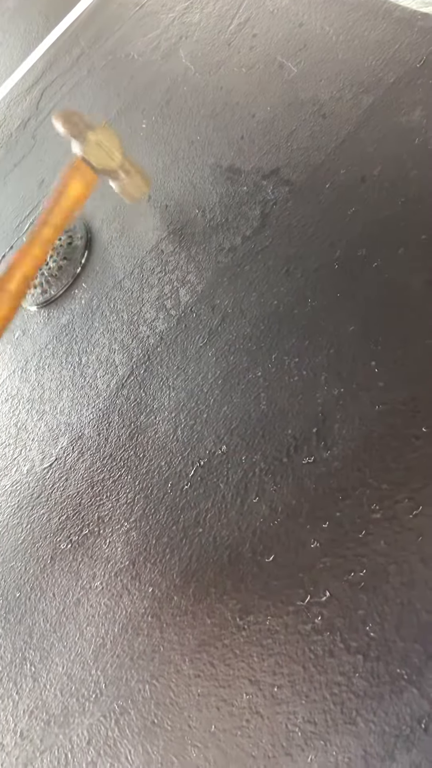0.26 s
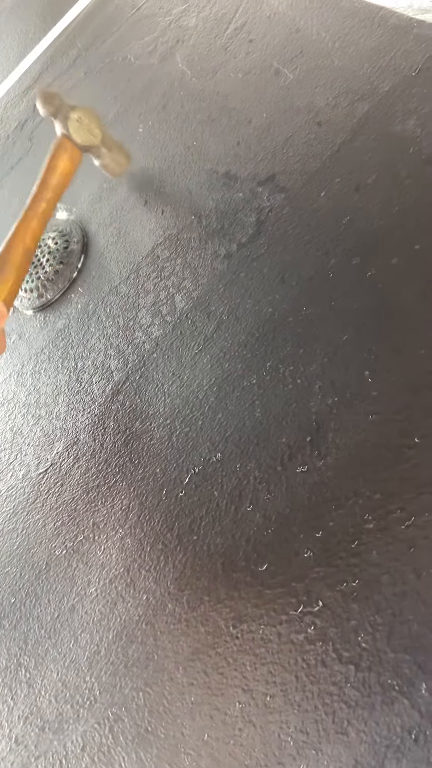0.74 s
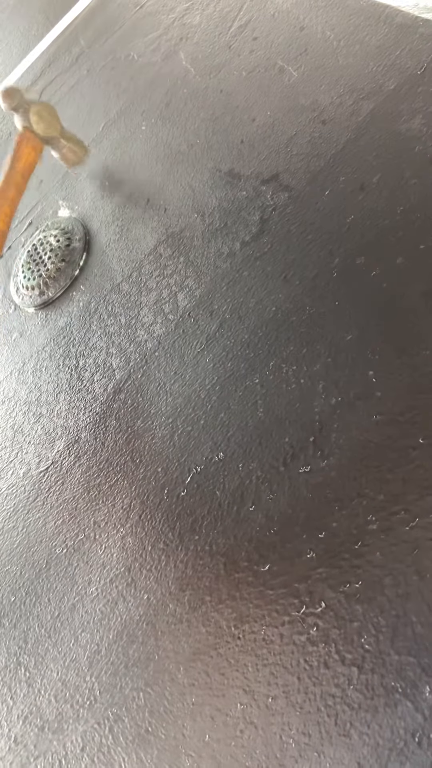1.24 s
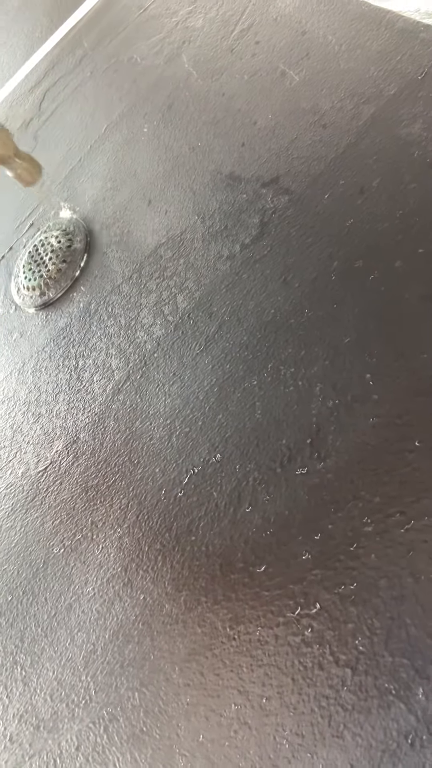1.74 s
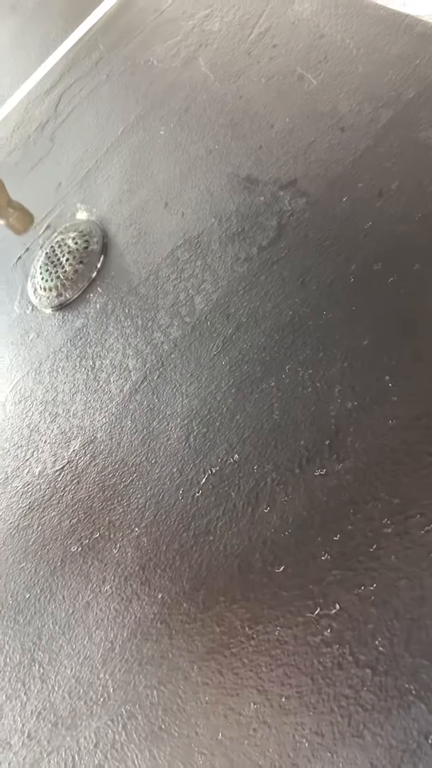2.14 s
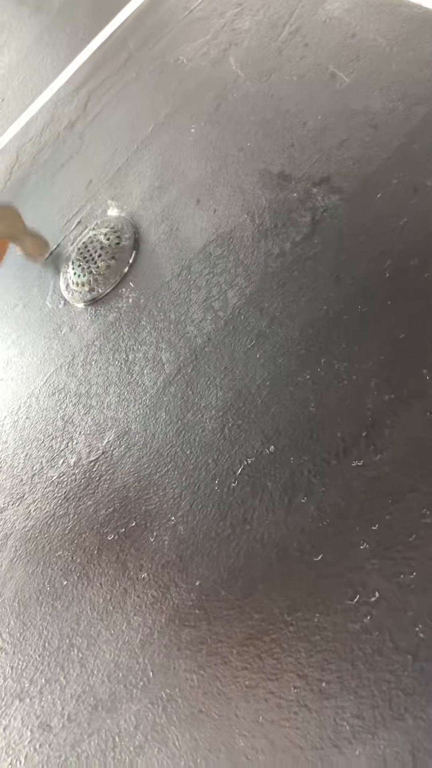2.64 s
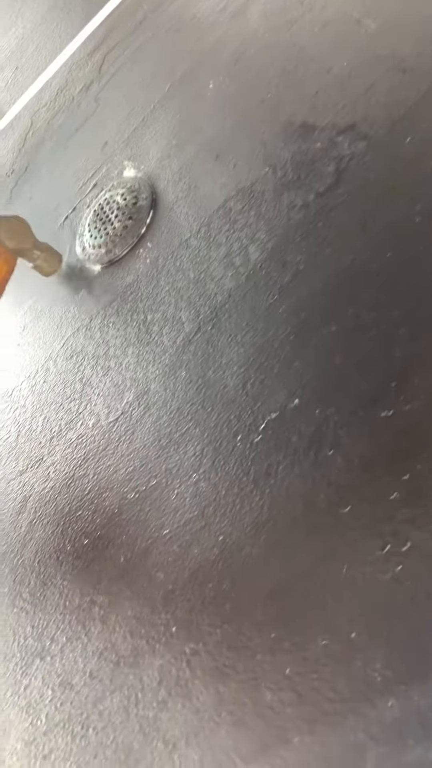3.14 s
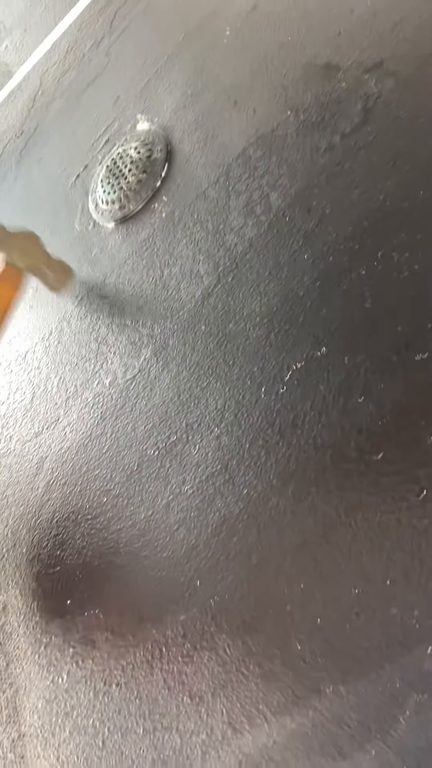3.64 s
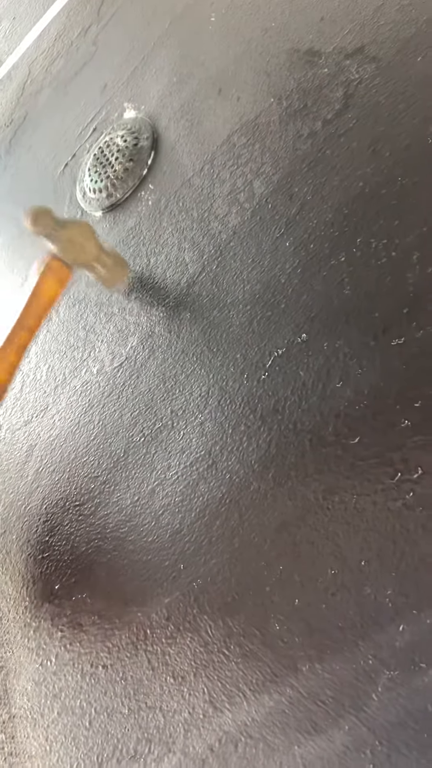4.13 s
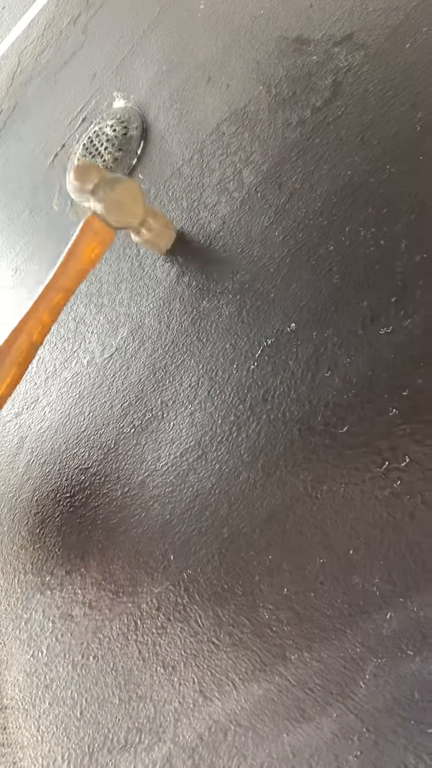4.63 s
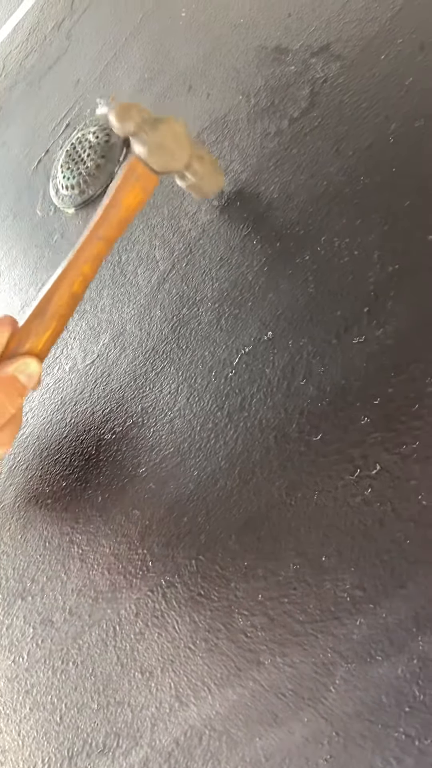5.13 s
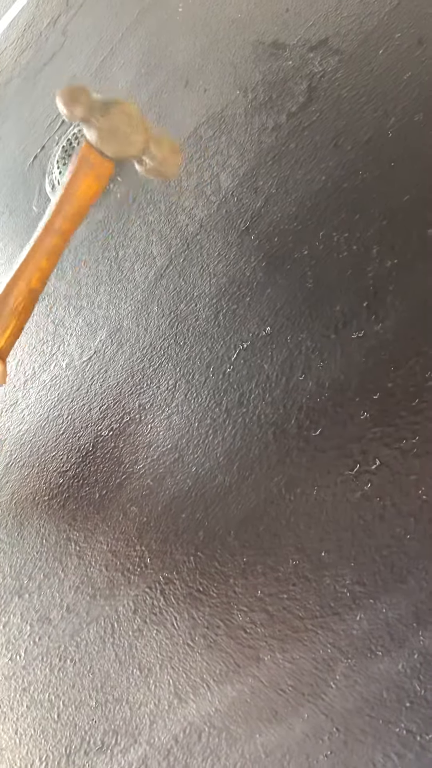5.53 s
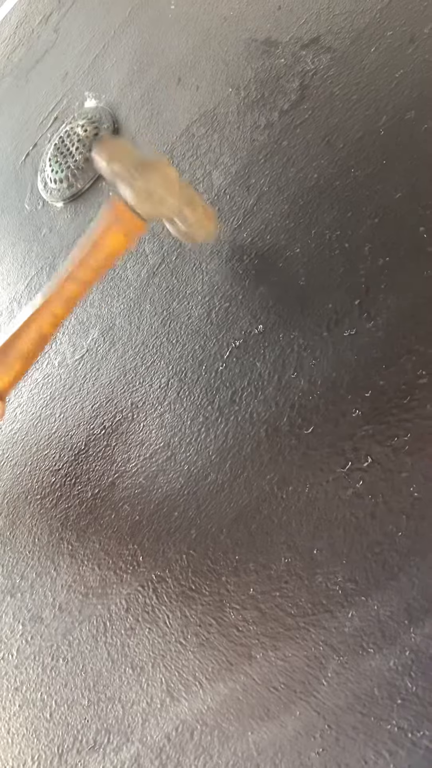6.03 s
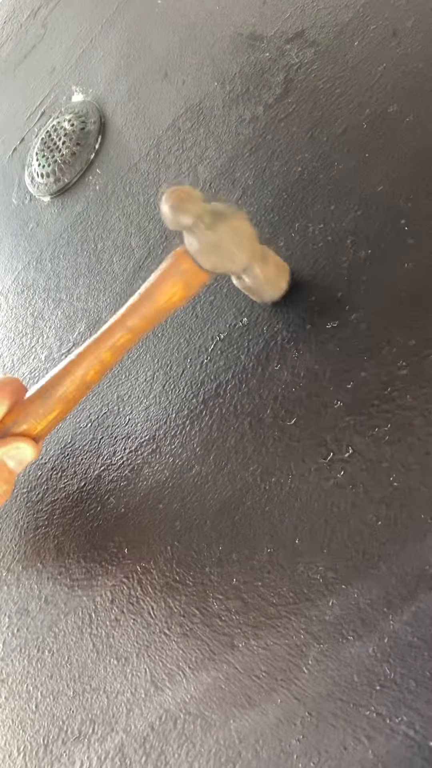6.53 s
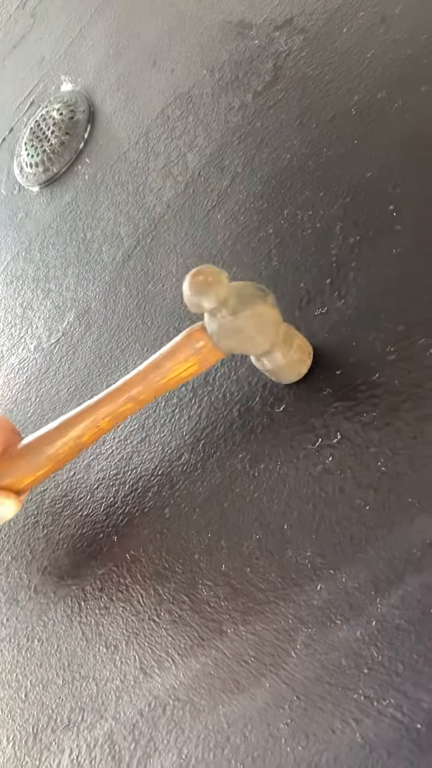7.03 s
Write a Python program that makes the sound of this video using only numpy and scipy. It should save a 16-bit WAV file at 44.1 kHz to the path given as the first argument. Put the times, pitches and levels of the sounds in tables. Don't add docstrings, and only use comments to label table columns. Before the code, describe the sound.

Close, even hammer taps on a hard fibreglass panel, dull and knocking at first, later brighter and boomier, with soft gusts of wind outdoors.

```python
import sys
import numpy as np
from scipy import signal
from scipy.fft import rfft, irfft
from scipy.io import wavfile
from scipy.ndimage import uniform_filter1d

SR = 44100
rng = np.random.default_rng(int(sys.argv[2]) if len(sys.argv) > 2 else 0)


def nominal_scale(level):
    x = np.asarray(level, float) / 20
    return 10 ** x


def wrap_up_sound(samples):
    columns = np.atleast_2d(samples).T
    tamed = np.clip(columns, -1, 1)
    steps = np.round(tamed * 32767).astype(np.int16)
    wavfile.write(sys.argv[1], SR, steps)


N = 320607

# time in seconds, spot (0 to 4, held at the end spots beyond), give of
# the skin as boom in dB, stiffness of the skin as clack in dB.
HAMMER_PATH = [(0, -0.5, 9, -6.5), (0.271, -3.8, -2.5, -9.5), (.6, -3, -8.5, -10), (1.1, 2, -6, -7.5),
               (1.6, -1.5, -3.5, -10), (1.82, -0.27, -1.5, -7), (2.501, 2, 1.5, -4), (2.64, 1.44, 3, 3.5),
               (2.85, 1.47, 1.5, 1.35), (3.1, 1.46, 2, 3.5), (3.7, 1.5, -5, 2.5), (4.15, 1.64, -3, -1.5),
               (4.6, 2, 2, -8.5), (4.799, 3.5, 12, -3.5), (6.1, 2.5, 9, -6.5), (6.28, 3.5, 12.5, -0.2),
               (6.5, 7, 7.5, -4), (7.2, 3.5, -6.5, -5.5)]
# start in seconds, strength in dB, contact hardness in dB, steel tick in dB.
BLOWS_ROUND_VENT = [(0.0295, -25, -7.5, -5.5), (0.2665, -15, -16, -12), (0.4758, -15.5, -16.5, -12),
                    (0.7179, -12, -15, -9), (.9286, -13.5, -15, -11.5), (1.144, -14.5, -13, -11),
                    (1.3549, -11.5, -13, -11), (1.5896, -12.5, -19, -12), (1.8118, -14.5, -17.5, -14.5),
                    (2.0105, -16.5, -29, -14.5), (2.213, -13, -24, -10), (2.4164, -17.5, -30.5, -11),
                    (2.6419, -19.5, -14, -13.5), (2.8402, -26, -32, -17)]
# start in seconds, strength in dB, contact hardness in dB, steel tick in dB.
BLOWS_OVER_PANEL = [(3.116, -20, -17, -22), (3.3884, -20.5, -17.5, -15.5), (3.6418, -19, -17, -20.5),
                    (3.9022, -17.5, -22.5, -16), (4.1265, -17, -15.5, -22), (4.374, -15, -27.5, -13.5),
                    (4.6159, -15, -10, -20), (4.852, -21, -12, 3), (5.1015, -22, -8.5, -4),
                    (5.333, -27.5, -12, -5.5), (5.582, -21.5, -13.5, -1), (5.8045, -19, -11.5, 0),
                    (6.0475, -19.5, -10, -4.5), (6.2783, -22, -8.5, -4), (6.51, -18, -13, -3),
                    (6.7352, -16, -16.5, -5), (6.9625, -15.5, -15.5, -9), (7.1703, -15, -25, -14.5)]
# start in seconds, level under that blow in dB,
# how much softer the contact is in dB.
BOUNCES = [(0.3211, -10, 7), (0.5089, -8, 3.5), (0.9574, -6.5, 10), (.976, -10.5, 14.5),
           (1.6308, -10.5, 10), (1.8584, -14.5, 25), (2.0427, -9, 20.5), (2.2444, -10.5, 9),
           (2.449, -7.5, 1.5), (2.6663, -9.5, 13), (2.858, -5.5, 17), (3.152, -10, 12), (3.9405, -11.5, 17),
           (4.157, -10, 38), (5.8424, -10.5, 10.5), (6.5665, -9, 4.5), (6.7948, -11.5, 19.5),
           (6.9914, -11.5, 20), (7.008, -20.5, 26)]
SOFT_SHARE = (-0.025, -0.033, 0.41, 0.89, 1)
RANGE_EDGES_HZ = (115, 600, 1450, 4000, 7000, 17000)
# frequency in Hz, then how strongly spots 0 to 4 drive it, five levels
# in dB.
PANEL_MODES = [(154.7, -1, -2.5, -15, -26.5, -6.5), (241.5, 3.5, 5.5, 4.5, 1.5, -2),
               (289.8, 2, 13, -3, 1, 12), (361.5, -14.5, -5, -6.5, -5, -12),
               (396.7, -3.5, -1, -8, 4.5, 1.5), (480, -11.5, -12, -10, 6.5, -8.5),
               (540.3, -15.5, -17.5, -16, -4, 2), (658, 0, -2, -3, -9, -8), (715, 1.5, -12, 4.5, -2.5, 7),
               (865, -1.5, -1, -2, -6, 6), (947, -8, -8.5, -12, -17, -11),
               (1140, -16.5, -6, -4.5, -20, -8.5), (1207, -11.5, -5, -4, -13, 2),
              (1310, -11.5, -9.5, -11, -18.5, -15), (1530, -11.5, -6, -1.5, -14.5, 1.5),
              (1750, -22.5, -11, -8, -27.5, -11.5), (1923, -14.5, 6, -13.5, -21, -14.5),
              (2124, -7.5, 2, -16.5, -31.5, -14), (2460, -29, -20.5, -14, -18, -59),
              (2764, -23.5, -35, -22.5, -19.5, -48), (3195, -38, -43.5, -21, -24.5, -39.5),
              (3870, -23.5, -34.5, -27.5, -28, -14)]
# frequency in Hz, time to fall 60 dB in seconds.
RING_TIME = [(140, 0.39), (300, 0.065), (700, .039), (1500, 0.015), (4000, 0.026), (12000, .007)]
# frequency in Hz, level in dB per Hz.
TICK_COLOUR = [(3500, 9), (5000, 5), (6300, -5), (7400, -21), (9500, -14), (13000, -25), (15200, -24),
               (16500, -36)]
# frequency in Hz, unlike share of the two sides in dB.
TAP_WIDTH = [(100, -33.5), (300, -20), (600, -5.5), (1300, -12.5), (3000, -7), (10000, -29)]
# delay in ms, level in dB.
RIB_ECHOES = [
    (1.1, -7),
    (2.3, -4.5),
    (3.899, -11),
    (6.2, -13),
]
# frequency in Hz, time to fall 60 dB in seconds, level in dB.
HOLLOW_TAIL = [(228, 0.27, -7), (910, 0.17, -5), (2400, 0.13, -6), (5300, 0.15, -13.5),
               (11000, 0.14, -15.5)]
# frequency in Hz, left ahead of right in radians.
PORT_LAG = [(0, 0), (1800, .25), (3300, 1.5), (5300, 1), (7300, 3.1), (10200, 6.2), (13500, 9.4),
            (17000, 12.5)]
# frequency in Hz, gain in dB.
TAP_TOP = [(11500, 0), (13000, -6.5), (15000, -3), (16000, -7), (17000, -20.5)]
# time in seconds, level in dB.
GUSTS = [(0, -44), (.4, -43.5), (.75, -49.5), (1.2, -45), (1.7, -49), (2.41, -46.5), (2.75, -50),
         (3.24, -45), (3.85, -49), (4.49, -45), (5.22, -41), (5.45, -46.5), (6.03, -41), (6.42, -48.5),
         (6.74, -38), (7.07, -46.5), (7.27, -43)]
# frequency in Hz, level in dB per Hz.
AIR_COLOUR = [(15, -39), (25, -13.5), (59, 10), (229, 1), (373, -13), (880, -13.5), (1480, -24.5),
              (2800, -34), (4370, -50), (5880, -60.5), (7310, -73.5), (9570, -66), (16000, -90)]
# frequency in Hz, side minus mid in dB.
AIR_WIDTH = [(60, -16.5), (110, -22.5), (200, -29.5), (600, -4), (1400, -11), (3000, 4), (10000, -4.5)]
# frequency in Hz, level in dB.
HAZE_COLOUR = [(100, -44.5), (500, -24.5), (1500, -16.5), (3500, -19.5), (6000, -38.5), (16000, -38.5)]

LEAD = 512
BLOW_SAMPLES = 16384
LATE_MS, LATE_MS_PER_DB = 5.55, 0.0941
DAMP_PER_STIFF = 0.067
TRAFFIC_DB, TRAFFIC_FADE_DB_PER_S = -49.5, 1.2
HISS_DB, HISS_FADE_DB_PER_S = -63, 1.53
PASSING_S, PASSING_WIDE_S, PASSING_DB = 4.3, .3, 4.5
HAZE_DB, HAZE_PER_DULL, HAZE_PER_STIFF = 4, .35, 0.97
LEFT_RIGHT = np.array([[1], [-1]])


def on_hz(table, hz, axis=1):
    table = np.array(table, float)
    return np.interp(np.log(hz), np.log(np.maximum(table[:, 0], 1)), table[:, axis])


def fade(t, t60):
    return np.exp(-np.log(1000) * t / t60)


def band(x, hz, octaves):
    f = np.maximum(np.fft.rfftfreq(x.shape[-1], 1 / SR), 1)
    bell = np.exp(-(np.log2(f / hz) / octaves) ** 2)
    y = irfft(rfft(x) * bell, x.shape[-1])
    return y / np.sqrt(np.mean(y ** 2, axis=-1, keepdims=True))


def hammer():
    t = np.arange(BLOW_SAMPLES) / SR
    out = np.zeros((2, N + BLOW_SAMPLES + LEAD))
    path = np.transpose(HAMMER_PATH)
    for s, parts_db in contacts():
        spot, _, stiff_db = (np.interp(s, path[0], column) for column in path[1:])
        late_ms = LATE_MS + LATE_MS_PER_DB * stiff_db
        hard_db = parts_db[3] - parts_db[2]
        damp = nominal_scale(-DAMP_PER_STIFF * (stiff_db + 6.5))
        parts = blow(t, spot, late_ms, hard_db, damp)
        start = int((s - .0008) * SR)
        out[:, start:start + len(t)] += np.tensordot(nominal_scale(parts_db - 1.96), parts, axes=1)
    f = np.fft.rfftfreq(out.shape[1], 1 / SR)
    lag = np.interp(f, *np.transpose(PORT_LAG))
    ports = np.exp(.5j * np.array([lag, -lag]))
    heard = irfft(rfft(out) * nominal_scale(on_hz(TAP_TOP, f + 1)) * ports, out.shape[1])
    return heard[:, LEAD:LEAD + N]


def contacts():
    path, blows = np.transpose(HAMMER_PATH), []
    for s, strength_db, hard_db, tick_db in BLOWS_ROUND_VENT + BLOWS_OVER_PANEL:
        give_db, stiff_db = (np.interp(s, path[0], column) for column in path[2:])
        balance_db = np.array([give_db, 0, stiff_db, hard_db, hard_db + tick_db])
        blows.append((s, strength_db + balance_db))
    rows = list(blows)
    for s, under_db, soft_db in BOUNCES:
        before_db = [db for start, db in blows if start < s][-1]
        rows.append((s, before_db + under_db - soft_db * np.array(SOFT_SHARE)))
    return sorted(rows, key=lambda row: row[0])


def blow(t, spot, late_ms, hard_db, damp):
    ring = panel_ring(t, spot, hard_db, damp)
    crack = steel_crack(t)
    f = np.fft.rfftfreq(len(t), 1 / SR) + 1
    travel = bending_waves(f, late_ms)
    parts = []
    for source, lo, hi in zip([ring] * 3 + [crack] * 2, RANGE_EDGES_HZ, RANGE_EDGES_HZ[1:]):
        fit = 1 / np.sqrt((1 + (lo / f) ** 12) * (1 + (f / hi) ** 24))
        part = irfft(rfft(source) * travel * fit, len(t))
        part /= part[:, LEAD:LEAD + SR // 50].std()
        parts.append(part + hull_tail(t, f, part, np.sqrt(lo * hi), fit))
    return np.array(parts)


def panel_ring(t, spot, hard_db, damp):
    ring = np.zeros((2, len(t)))
    modes = PANEL_MODES
    chance = rng.standard_normal((len(modes), 4))
    for (hz, *spots_db), (tune, size, a, b) in zip(modes, chance):
        ring_s = on_hz(RING_TIME, hz)
        wave = np.exp(2j * np.pi * hz * (1 + 0.017 * tune) * t) * fade(t, damp * ring_s)
        ears = 1 + LEFT_RIGHT * nominal_scale(on_hz(TAP_WIDTH, hz)) * (a + 1j * b) * .7
        gain = nominal_scale(np.interp(spot, range(5), spots_db) + 2.0 * size) / ring_s
        above_knee = np.clip(np.log2(hz / 2500) / 0.074, 0, 1)
        gain *= nominal_scale(1.2 * min(hard_db + 10, 0) * above_knee)
        ring += gain * (ears * wave).real
    return ring


def steel_crack(t):
    crack = np.zeros((2, len(t)))
    for hz in 4500 * 2 ** np.arange(0, 2, 1 / 3):
        mid, side = band(rng.standard_normal((2, len(t))), hz, 0.18)
        mid[:2] += 9.
        both = mid + LEFT_RIGHT * nominal_scale(on_hz(TAP_WIDTH, hz)) * side
        crack += nominal_scale(on_hz(TICK_COLOUR, hz)) * np.sqrt(hz) * both * fade(t, on_hz(RING_TIME, hz))
    return crack


def bending_waves(f, late_ms):
    steep = .8
    turns = late_ms * .3 * (np.maximum(f, 70) / 300) ** (1 - steep) / (1 - steep)
    travel = np.exp(-2j * np.pi * (turns + f * LEAD / SR))
    short = 1 / (1 + (750 / f) ** 4) / (1 + (f / 4500) ** 2)
    chance = rng.standard_normal((len(RIB_ECHOES), 2))
    for (ms, db), (shift, flip) in zip(RIB_ECHOES, chance):
        delay = np.exp(-2j * np.pi * f * ms * (1 + .2 * shift) / 1000)
        travel = travel * (1 + short * np.sign(flip) * nominal_scale(db) * delay)
    return travel


def hull_tail(t, f, part, hz, fit):
    spectrum = uniform_filter1d(np.abs(rfft(part[0])), size=int(hz / 8))
    colour = np.abs(spectrum) ** 0.8 * f ** -.6 * fit
    mid, side = irfft(rfft(rng.standard_normal((2, len(t)))) * colour, len(t))
    mid, side = mid / mid.std(), side / side.std()
    swell = (1 - np.exp(-t / 0.0032)) * fade(t, on_hz(HOLLOW_TAIL, hz))
    both = mid + LEFT_RIGHT * nominal_scale(on_hz(TAP_WIDTH, hz) + 2) * side
    return nominal_scale(on_hz(HOLLOW_TAIL, hz, axis=2)) * np.roll(swell, LEAD) * both


def outdoors():
    t = np.arange(N) / SR
    wind_db = np.interp(t, *np.transpose(GUSTS))
    traffic_db = TRAFFIC_DB - TRAFFIC_FADE_DB_PER_S * t
    passing_db = PASSING_DB * np.exp(-((t - PASSING_S) / PASSING_WIDE_S) ** 2)
    hiss_db = HISS_DB - HISS_FADE_DB_PER_S * t + passing_db
    layers = np.zeros((3, 2, N))
    for hz in 30 * 2 ** np.arange(0, 9.1, .5):
        mid, side = band(rng.standard_normal((2, N)), hz, .3)
        flicker_db = (2.5 if hz < 300 else 1.8) * walk(11) + 1.5 * walk(1.5)
        both = mid + nominal_scale(on_hz(AIR_WIDTH, hz)) * side * LEFT_RIGHT
        layer = np.searchsorted((130, 1700), hz)
        layers[layer] += nominal_scale(on_hz(AIR_COLOUR, hz) + flicker_db) * np.sqrt(hz) * both
    levels_db = (wind_db + 1.5, traffic_db + 7., hiss_db + 2.5)
    return sum(x / x.std() * nominal_scale(db) for x, db in zip(layers, levels_db))


def walk(rate):
    k = int(SR / rate)
    held = np.repeat(rng.standard_normal(N // k + 1), k)
    return uniform_filter1d(uniform_filter1d(held, k), k)[:N]


def scene():
    return hammer() + outdoors()


def grainy_haze(loud):
    f, t, frames = signal.stft(loud, SR, nperseg=1024)
    s, _, hard_db, tick_db = np.transpose(BLOWS_ROUND_VENT + BLOWS_OVER_PANEL)
    haze_db = np.interp(t, s, HAZE_DB - HAZE_PER_DULL * (hard_db + tick_db + 25))
    haze_db += HAZE_PER_STIFF * np.interp(t, *np.transpose(HAMMER_PATH)[[0, 3]])
    spin = np.exp(2j * np.pi * rng.random(frames.shape[1:]))
    level = nominal_scale(on_hz(HAZE_COLOUR, f + 1)[:, None] + haze_db)
    return signal.istft(np.abs(frames) * spin * level, SR)[1][:, :N]


def band_limit(x):
    return signal.sosfilt(signal.butter(12, 17150, fs=SR, output="sos"), x)


def record(dry):
    top = 1.3
    loud = dry / (1 + np.abs(dry / top) ** 4) ** (1 / 4)
    clipped = np.clip(loud + grainy_haze(loud), -top, top)
    cut = signal.ellip(10, .2, 90, 16900, fs=SR, output="sos")
    mix = signal.sosfilt(cut, clipped)
    return band_limit(mix)


dry = scene()
out = record(dry)
wrap_up_sound(out)
```